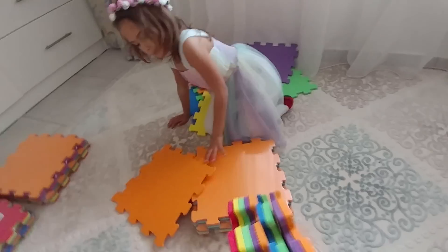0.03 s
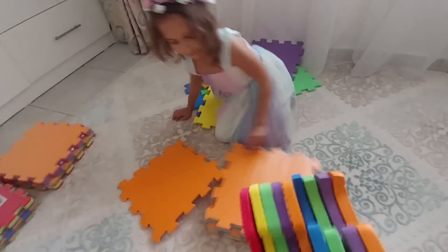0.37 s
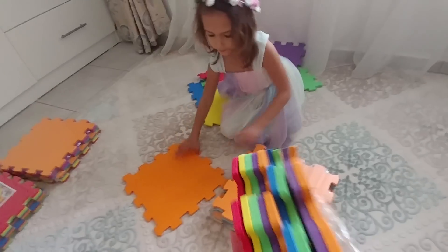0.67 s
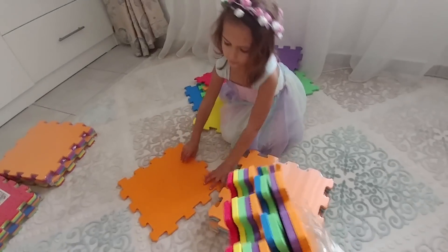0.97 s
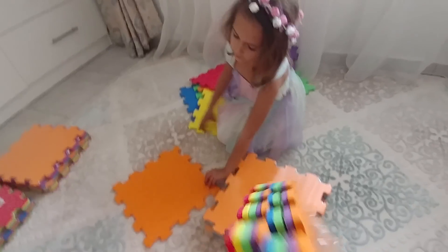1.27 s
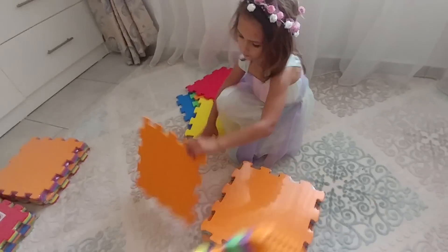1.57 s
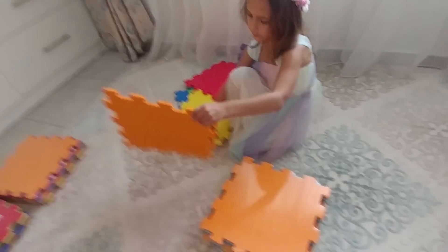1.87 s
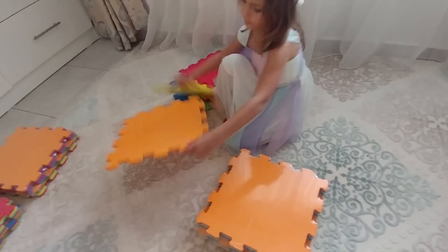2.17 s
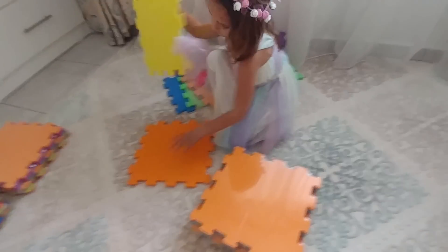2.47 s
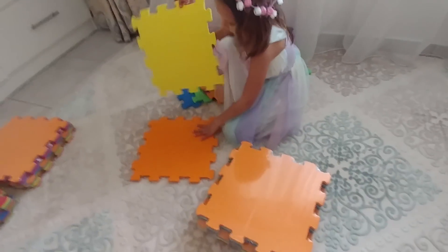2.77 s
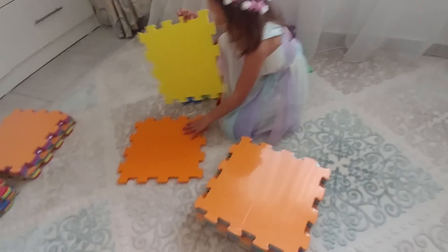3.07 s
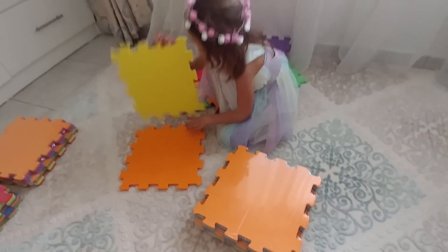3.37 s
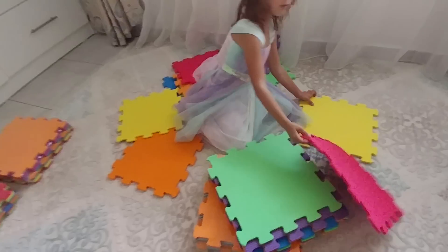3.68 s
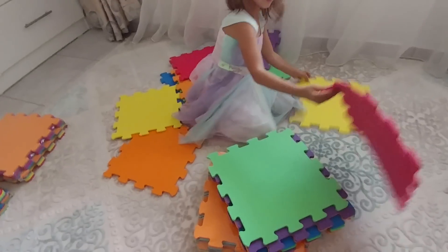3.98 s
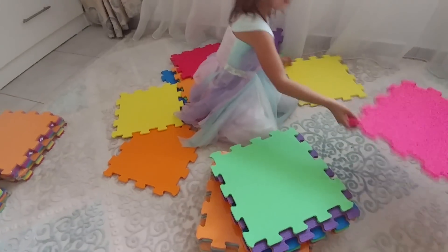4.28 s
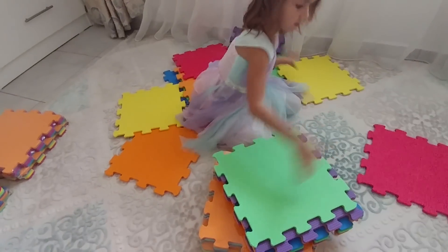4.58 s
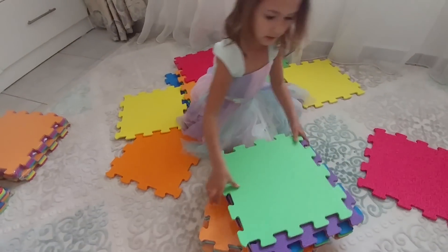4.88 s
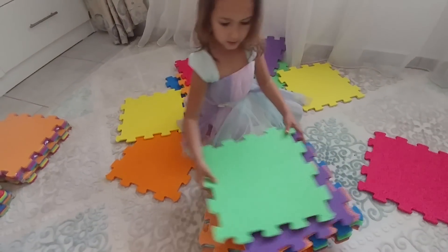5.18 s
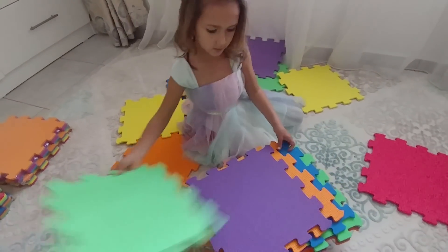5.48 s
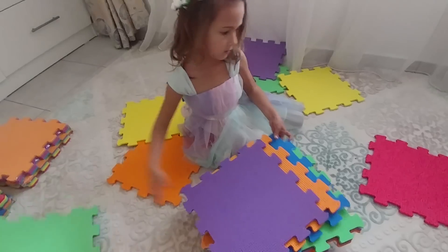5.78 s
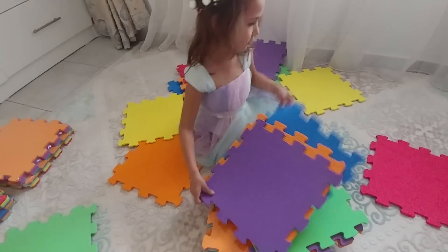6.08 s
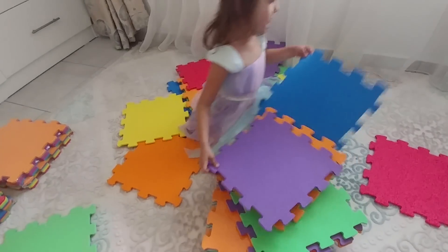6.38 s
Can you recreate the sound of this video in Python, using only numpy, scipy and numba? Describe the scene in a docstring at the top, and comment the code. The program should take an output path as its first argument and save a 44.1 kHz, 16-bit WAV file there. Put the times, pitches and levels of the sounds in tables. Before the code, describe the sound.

Close crackling of plastic wrap and squeezed foam, followed by quieter hissing slides and soft thuds of foam tiles farther away.

```python
"""A small room with a rug. A plastic-wrapped pack of foam floor tiles is gripped and turned right by
the microphone: the film crinkles and snaps, the foam creaks and bumps. Then, farther off, a skirt
rustles, and loose tiles slide off a stack with a fine hiss and flop onto the rug.
Faint room tone and a low drone lie beneath. The microphone ports ring near 9 kHz."""
import sys
import numpy as np
from scipy import signal
from scipy.fft import rfft, irfft, next_fast_len
from scipy.io import wavfile
from numba import njit

SR = 44100
rng = np.random.default_rng(int(sys.argv[2]) if len(sys.argv) > 2 else 0)


def int16_out(signal):
    """Quantize to a 16-bit WAV file."""
    q = np.round(np.clip(np.atleast_2d(signal).T, -1, 1) * 32767)
    wavfile.write(sys.argv[1], SR, q.astype(np.int16))


N = 292912
TIME_S = np.arange(N) / SR

# film tick spectrum (frequency [Hz], density [dB])
TICK_SPECTRUM = [(500, -34), (2000, -16), (4500, -12), (6500, -3.5), (8500, 8.5), (10000, 1.5),
                 (12500, -0.5), (16000, -3.5)]
# foam creak spectrum (frequency [Hz], density [dB])
CREAK_SPECTRUM = [(100, -27.5), (400, -17), (750, -3), (1050, -2), (1400, -3), (1950, 0), (2350, -0.5),
                  (2900, -7.5), (4000, -9), (8000, -29)]


def from_db(db):
    """Decibels to gain."""
    return 10 ** (np.asarray(db) / 20)


def rms_one(x):
    """Scale to rms 1."""
    return x / np.sqrt(np.mean(x ** 2) + 1e-20)


def at_hz(points, hz):
    """Read a table on a log-frequency axis."""
    points_hz, values = np.transpose(points)
    return np.interp(np.log(hz + 1), np.log(points_hz), values)


def panned(db):
    """Constant-power gains; pan is left minus right."""
    gains = from_db(np.array([np.atleast_1d(db), -np.atleast_1d(db)]) / 2)
    return gains / np.sqrt(np.mean(gains ** 2, axis=0))


def response(spectrum, size=4096):
    """Minimum-phase impulse response of a spectrum."""
    cepstrum = irfft(np.log(from_db(at_hz(spectrum, np.fft.rfftfreq(size, 1 / SR)))))
    cepstrum[1:size // 2] *= 2
    cepstrum[size // 2 + 1:] = 0
    return irfft(np.exp(rfft(cepstrum)))


def through(x, impulse):
    """Convolve both channels."""
    return signal.oaconvolve(x, np.atleast_2d(impulse), axes=1)[:, :N]


def coloured(x, spectrum):
    """Shape a white input, keeping its power."""
    impulse = response(spectrum)
    return through(x, impulse / np.linalg.norm(impulse))


def resonance(x, hz, q):
    """Band-pass that keeps the power of a white input."""
    b, a = signal.iirpeak(hz, q, fs=SR)
    return signal.lfilter(b / np.sqrt(b[0]), a, x)


def double_resonance(x, hz, q):
    """Two equal resonances in series."""
    return resonance(resonance(x, hz, q), hz, q)


@njit
def gliding_resonance(x, rad_per_sample, radius):
    """Two-pole resonance with a moving centre."""
    y = np.zeros_like(x)
    for c in range(2):
        for i in range(2, x.shape[1]):
            feedback = 2 * radius * np.cos(rad_per_sample[i]) * y[c, i - 1] - radius ** 2 * y[c, i - 2]
            y[c, i] = x[c, i] - x[c, i - 2] + feedback
    return y


def stereo_noise():
    """White noise, alike on both sides in the low mids, unrelated in the treble."""
    # (frequency [Hz], left-right correlation [ratio])
    correlation = [(50, 0.11), (130, 0.71), (350, 0.9), (700, 0.88), (1400, 0.34), (3000, 0.039), (6500, 0),
                   (16000, 0)]
    size = next_fast_len(N)
    mid, side = rfft(rng.standard_normal((2, size)))
    alike = at_hz(correlation, np.fft.rfftfreq(size, 1 / SR))
    spectra = np.sqrt(1 + alike) * mid + np.sqrt(1 - alike) * side * [[1], [-1]]
    return rms_one(irfft(spectra, size)[:, :N])


def dying(x, fall_s):
    """Exponential decay of each impulse, keeping its sum."""
    pole = np.exp(-1 / (fall_s * SR))
    return signal.lfilter([1 - pole], [1, -pole], x + 1e-18)


def slips(per_s, spread_db, width_db):
    """Energy of random stick-slip releases, uneven in size and direction."""
    at = np.flatnonzero(rng.random(N) < per_s / SR)
    size, side = rng.exponential(1, N)[at], rng.standard_normal(N)[at]
    energy = np.zeros((2, N))
    energy[:, at] = (from_db(spread_db * np.minimum(size, 3)) * panned(width_db * side)) ** 2
    return energy / energy.mean()


def grainy(energy, fall_s, smooth):
    """A noise burst per release, plus a share of smooth friction."""
    return stereo_noise() * np.sqrt(smooth + (1 - smooth) * dying(energy, fall_s))


def stroke(start_s, length_s):
    """Speed of one sweep: from rest to 1 and back."""
    return np.sin(np.pi * np.clip((TIME_S - start_s) / length_s, 0, 1)).clip(0)


def sweeps(rows):
    """Gain of a series of strokes."""
    return np.sqrt(sum((from_db(db) * stroke(s, length_s)) ** 2 for s, length_s, db in rows))


def contacts(rows, spectrum):
    """Soft foam touches bit by bit and is damped at once: swell and fall, no ring."""
    power = np.zeros(N)
    for peak_s, db, rise_s, fall_s in rows:
        decay = np.maximum((peak_s - TIME_S) / rise_s, (TIME_S - peak_s) / fall_s)
        power += from_db(db) ** 2 * np.exp(-2 * np.minimum(decay, 20))
    return coloured(np.sqrt(power) * stereo_noise(), spectrum)


def bumps(rows, rise_cycles, fall_cycles):
    """Knocked foam bends, swings a few times and stops."""
    out, t = np.zeros((2, N + SR)), TIME_S[:SR // 4]
    for start_s, db, hz, pan_db in rows:
        cycles, start = hz * t, round(start_s * SR)
        envelope = (1 - np.exp(-cycles / rise_cycles)) * np.exp(-cycles / fall_cycles)
        swing = envelope * np.sin(2 * np.pi * cycles)
        out[:, start:start + len(t)] += from_db(db) * swing * panned(pan_db)
    return out[:, :N]


def room_tone():
    """Steady, faint, bass-heavy noise."""
    # (frequency [Hz], density [dB])
    spectrum = [(20, -12), (45, -11), (62, 2), (90, -6), (200, -8.5), (500, -14), (1200, -17),
                (3500, -23.5), (8000, -25.5), (11000, -23), (16000, -24)]
    return from_db(-66.5) * coloured(stereo_noise(), spectrum)


def drone():
    """Narrow, wavering rumble in the room."""
    # (time [s], level [dB])
    levels = [(0, -92), (3.598, -74), (3.87, -60.5), (4.05, -71.5), (5.1, -70), (5.6, -79), (6.64, -74)]
    gain = from_db(np.interp(TIME_S, *np.transpose(levels)))
    return gain * rms_one(double_resonance(stereo_noise(), hz=61, q=3.3))


def reflections(x, t60_s=0.19, cutoff_hz=3500):
    """Diffuse room tail, dulled by rug and curtains."""
    t = TIME_S[:SR // 2]
    tail = rng.standard_normal((2, len(t))) * from_db(-60 * t / t60_s) * (t > 0.005)
    tail = signal.sosfilt(signal.butter(1, cutoff_hz, fs=SR, output="sos"), tail)
    return through(x, tail / np.linalg.norm(tail, axis=1, keepdims=True))


def skirt():
    """Thin netting sweeps over the rug."""
    # (time [s], length [s], level [dB])
    strokes = [(3.64, 0.38, -55), (3.97, 0.12, -52), (4.06, 0.29, -58), (4.40, .08, -68.5)]
    # (frequency [Hz], density [dB])
    spectrum = [(200, -17), (900, -10.5), (2500, -17.5), (5000, -19.5), (7500, -10), (9500, 0.5),
                (10800, 8.5), (12500, -2.5), (15500, -16)]
    return coloured(sweeps(strokes) * stereo_noise(), spectrum) * from_db(3) * panned(-2.5)


def tile_slides(rub_exponent=0.47):
    """Embossed faces rub: hiss follows speed, rub a power of it. One tile catches and squeaks."""
    # (time [s], length [s], rub [dB], hiss [dB])
    slides = [(4.605, .11, -65, -58), (4.703, 0.12, -56.5, -53), (4.985, .13, -59.5, -62.5),
              (5.09, 0.16, -54.5, -48), (5.197, 0.15, -67, -51.5), (5.409, 0.12, -71, -70),
              (5.63, 0.15, -72.5, -68), (5.8, 0.1, -52, -46), (5.862, 0.54, -57, -41),
              (6.286, 0.24, -62.5, -48.5), (6.487, .17, -53.5, -51)]
    # (time [s], length [s], level [dB])
    catches = [(5.98, 0.031, -52.5)]
    # (frequency [Hz], density [dB])
    rub_spectrum = [(100, -21), (600, -13.5), (1400, -4), (2400, -3.5), (3300, -4.5), (4300, -8),
                    (5500, -5.5), (12000, -49)]
    hiss_spectrum = [(500, -55), (2000, -9.5), (4500, -3), (7000, 0), (9500, 5.5), (10800, 9), (13000, 5),
                     (16000, -1)]
    rub_gain, hiss_gain = np.zeros((2, N))
    for start_s, length_s, rub_db, hiss_db in slides:
        speed = stroke(start_s, length_s)
        rub_gain = np.hypot(rub_gain, from_db(rub_db) * speed ** rub_exponent)
        hiss_gain = np.hypot(hiss_gain, from_db(hiss_db) * speed)
    energy = slips(per_s=2000, spread_db=9.5, width_db=9)
    rub = coloured(rub_gain * grainy(energy, fall_s=0.00085, smooth=0.78), rub_spectrum)
    hiss = coloured(hiss_gain * grainy(energy, fall_s=0.00048, smooth=0.9), hiss_spectrum)
    catch = sweeps(catches) * rms_one(double_resonance(stereo_noise(), hz=3340, q=9))
    return rub * from_db(-1.5) * panned(-1.9) + hiss * from_db(2.5) * panned(-1.5) + catch


def scuff_and_landings():
    """A brief scuff leads into the pack's last tick; later, tiles flop down and pat flat."""
    # (time [s], level [dB], rise [s], fall [s])
    flops = [(4.275, -58, .02, 0.033), (5.327, -47.5, .005, 0.024), (5.718, -48, 0.004, 0.034),
             (5.763, -41, 0.0026, 0.023), (5.787, -36, 0.002, 0.012), (5.809, -39, 0.0061, 0.026),
             (6.425, -54, 0.021, 0.049), (6.503, -45, 0.0045, 0.028)]
    scuff_and_pats = [(3.668, -46.5, 0.011, 0.003), (4.614, -38.5, 0.0008, 0.029),
                      (5.359, -54, .001, 0.0046)]
    # (frequency [Hz], density [dB])
    flop_spectrum = [(25, -4), (65, -1.5), (130, 2), (300, -1), (600, -6.5), (950, -12.5), (1500, -26.5),
                     (4000, -44), (12000, -49)]
    scuff_and_pat_spectrum = [(40, -2), (140, 11.5), (300, 3), (800, 0.5), (1400, 8.5), (2300, 5.5),
                              (3500, 0), (6000, -29), (14000, -1)]
    return contacts(flops, flop_spectrum) + contacts(scuff_and_pats, scuff_and_pat_spectrum)


def tile_edges():
    """Toothed edges scuff the rug and swish past other tiles."""
    # (time [s], level [dB], rise [s], fall [s])
    scuffs = [(4.29, -60, 0.022, 0.036), (5.292, -55.5, .003, 0.012), (5.329, -49.5, 0.0091, 0.014),
              (5.356, -53, .004, 0.0061)]
    swishes = [(4.77, -51, 0.035, 0.024), (5.285, -36.5, 0.05, 0.023), (5.729, -38, 0.0026, 0.0086)]
    # (frequency [Hz], density [dB])
    scuff_spectrum = [(60, -19), (200, -8), (450, -2), (800, -4), (1150, -10), (1600, -15), (3000, -31),
                      (10000, -24)]
    swish_spectrum = [(3000, -23), (7000, -32), (10000, -21), (12000, -11), (14000, -5), (16000, -9)]
    return contacts(scuffs, scuff_spectrum) + contacts(swishes, swish_spectrum)


def tile_thuds():
    """Falling tiles knock edge-on or thud flat on the floor."""
    # (time [s], level [dB], pitch [Hz], pan [dB])
    thuds = [(5.288, -40.5, 1050, -2), (5.335, -51.5, 89.4, -2), (5.716, -40.5, 66, 1),
             (5.788, -34, 147, 1), (6.505, -41.5, 125, -3)]
    return bumps(thuds, rise_cycles=0.35, fall_cycles=2.74)


def pack_knocks():
    """The pack knocks hollowly against hand and microphone."""
    # (time [s], level [dB], pitch [Hz], pan [dB])
    knocks = [(.113, -10, 410, 3), (0.353, -43.5, 146, -1), (.793, -41.5, 330, -4), (0.846, -30, 630, -5),
              (0.876, -27.5, 483, 3), (0.936, -38, 298, -6), (1.25, -36, 340, -1), (1.40, -39, 100, -11),
              (1.72, -32, 120, -1), (2.327, -33.5, 250, 1), (2.476, -21.5, 64, -12),
              (3.505, -38.5, 95.6, -8.5)]
    return bumps(knocks, rise_cycles=0.11, fall_cycles=2)


def snap(gains, tail_share, fall_s, size):
    """A click with a short noisy tail."""
    click = np.zeros((2, size))
    click[:, :1] = gains
    tail = np.sqrt(tail_share * dying(click ** 2, fall_s)) * rng.standard_normal((2, size))
    return np.sqrt(1 - tail_share) * click + tail


def film_snaps(size=1024):
    """The film buckles with a tick and knocks on the foam, which rings briefly."""
    # (time [s], knock [dB], tick [dB], pan [dB], foam ring [Hz])
    buckles = [(0.0513, -9.5, -15, -3, 725), (.077, -2.5, 2.5, -7.5, 1630), (0.1133, 10.5, -0.5, -1.5, 850),
               (0.1318, 2.5, -16.5, -6, 1280), (0.1868, -24, -7, -19, 1600), (0.2636, -14, -10, 3, 1360),
               (0.4074, -25, -17, -2, 1240), (0.6862, -15, -0.5, -7, 2010), (.6906, -14, -2, -5, 2100),
               (0.7284, -25, -1, -3, 1850), (0.744, -27, -1.5, -11, 1840), (1.002, -21, 2, 2, 1520),
               (1.0274, -6.5, 0, -13, 1710), (1.2581, -16.5, -3, -12, 624), (1.3815, -30, -8, -23, 1850),
               (1.4143, -12.5, 4.5, 1, 1730), (1.4685, -9.5, -32, 3, 1770), (1.5509, -10, -10, 0, 1650),
               (1.6416, -24, 0, -27, 1160), (1.655, -26, 5.5, -13, 2140), (1.7171, -6.5, -19, -14, 1200),
               (1.761, -6, 7, -24, 1820), (1.7784, -2, -7, 2, 1910), (1.8724, -9.5, -28, 0, 1020),
               (1.9607, -2.5, -11, -4, 1800), (1.9718, -7.5, 7, -30, 2040), (2.0309, -2, 8, -10, 2150),
               (2.0465, -0.5, -3, -9.5, 1840), (2.0832, -7, -8, -12, 1830), (2.1355, -26, 3, -17, 1790),
               (2.1546, -1.5, 10, -4.5, 1850), (2.229, -19, -5, -5, 2270), (2.2887, -14, -11, -6, 1270),
               (2.3538, -13, -21, -3, 990), (2.3997, 0.5, 5, -0.5, 2090), (2.42, 10.5, 1.5, -3, 2100),
               (2.4621, 11, 9.5, 2, 1480), (2.4838, -1.5, -3.5, -4.5, 1700), (2.5479, -9, -6, -14, 1600),
               (2.7427, -8, -7, 3, 2270), (2.8512, -20, -9, 6, 1650), (2.9427, -13.5, -5, -5, 1630),
               (3.1099, -24, -7.5, -3, 1570), (3.1929, -22.5, -5.5, -7, 1500),
               (3.2089, -18.5, -14, -1, 2060), (3.2793, -39, -2, 16, 2090), (3.3586, -22, -3, -5, 2270),
               (3.5235, -17.5, -7, -1, 1020), (3.543, -27, -8, -17, 1980), (3.6186, -36, -9.5, -7, 2200),
               (3.6684, -32.5, -0.5, -1.5, 1010)]
    # (frequency [Hz], density [dB])
    knock_spectrum = [(30, -16), (100, -9.5), (350, -10.5), (700, 7), (1100, 0.5), (1800, 4.5), (2400, 3.5),
                      (3200, -13.5), (6000, -8.5), (12000, -37)]
    knocks, rings, ticks = np.zeros((3, 2, N))
    for start_s, knock_db, tick_db, pan_db, hz in buckles:
        at = slice(round(start_s * SR), round(start_s * SR) + size)
        pan = panned(pan_db)
        knock = snap(from_db(knock_db) * pan, tail_share=0.3, fall_s=0.0015, size=size)
        knocks[:, at] += knock
        rings[:, at] += double_resonance(knock, hz, q=1.3) * np.sqrt(10 * hz / SR)
        ticks[:, at] += snap(from_db(tick_db) * pan, tail_share=0.91, fall_s=0.0005, size=size)
    foam = from_db(-8) * coloured(knocks, knock_spectrum) + from_db(-6) * rings
    return foam + from_db(-8.5) * coloured(ticks, TICK_SPECTRUM)


def film_creases(count=9):
    """Small creases flip one by one, each ringing at its own pitch."""
    energy = slips(per_s=300, spread_db=3.5, width_db=10.5)
    crease_index = rng.integers(0, count, N)
    noise = rng.standard_normal((2, N))
    rings = np.zeros((2, N))
    for k, hz in enumerate(np.geomspace(4200, 13000, count)):
        envelope = np.sqrt(dying(energy * (crease_index == k), fall_s=0.00035))
        rings += resonance(envelope * noise, hz, q=5.2)
    return coloured(rings, TICK_SPECTRUM)


def foam_squeak(hz, width_hz=280):
    """Separate slips ring the squeezed foam at the pitch of the grip."""
    energy = slips(per_s=150, spread_db=4, width_db=0.5)
    kicks = coloured(grainy(energy, fall_s=0.0013, smooth=0.15), CREAK_SPECTRUM)
    return rms_one(gliding_resonance(kicks, 2 * np.pi * hz / SR, np.exp(-np.pi * width_hz / SR)))


def held(start_s, rise_s, hold_s, fall_s=0.021):
    """Attack, hold and release of one squeeze."""
    t = TIME_S - start_s
    return np.exp(-np.clip(np.maximum(-t / rise_s, (t - hold_s) / fall_s), 0, 20))


def grip(stir_hz=1400, wander_db=2.5, wanders_per_s=52):
    """Squeezes over a faint stir: bump, creak and crinkle gains, and creak-weighted foam pitch."""
    # (time [s], rise [s], hold [s], bump [dB], creak [dB], crinkle [dB], foam ring [Hz])
    squeezes = [(0.034, 0.031, 0.034, -51, -50, -38, 900.0),
                (0.084, 0.019, 0.046, -39.5, -29.5, -26.5, 1600.0),
                (0.122, 0.012, 0.022, -29, -26.5, -19, 1750.0),
                (0.217, 0.018, 0.069, -56, -44.5, -44.5, 1500.0),
                (0.479, 0.008, 0.054, -54.5, -55.5, -49.5, 1200.0),
                (0.659, 0.02, 0.056, -50, -39.5, -32.5, 1900.0),
                (0.794, 0.013, 0.026, -54.5, -53, -41.0, 1000.0),
                (0.853, 0.006, 0.016, -39.5, -32, -28.5, 800.0),
                (0.943, 0.019, 0.003, -40.5, -39.5, -33.0, 1300.0),
                (1.005, 0.024, 0.036, -48.5, -37.5, -29.5, 1900.0),
                (1.141, 0.024, 0.038, -61, -57, -39.5, 2000.0),
                (1.232, 0.028, 0.038, -45.5, -47, -42.5, 1300.0),
                (1.279, 0.014, 0.028, -58, -47.0, -36.5, 1300.0),
                (1.406, 0.019, 0.012, -38.5, -35, -30, 1650.0),
                (1.491, 0.017, 0.082, -45, -40.5, -37.5, 1100.0),
                (1.64, 0.016, 0.022, -52, -45.5, -32, 1400.0),
                (1.683, 0.013, 0.05, -42.5, -39, -39, 1400.0),
                (1.756, 0.027, 0.057, -36.5, -27.0, -19, 1900.0),
                (1.882, 0.014, 0.052, -63, -51, -41, 1200.0),
                (1.958, 0.005, 0.034, -48, -37.0, -25, 2050.0),
                (2.043, 0.012, 0.004, -40, -27.5, -18.5, 1900.0),
                (2.089, 0.013, 0.03, -60, -40, -36.5, 1750.0),
                (2.149, 0.016, 0.003, -35, -27, -20.0, 1950.0),
                (2.212, 0.006, 0.005, -59, -44.5, -35.5, 1900.0),
                (2.291, 0.026, 0.074, -52.5, -49, -50.5, 1200.0),
                (2.401, 0.015, 0.06, -48, -30.5, -27.5, 2000.0),
                (2.48, 0.022, 0.004, -20, -16, -10, 1700.0),
                (2.521, 0.014, 0.074, -43.5, -33.5, -30.5, 1700.0),
                (2.681, 0.046, 0.009, -68, -42, -32.5, 1900.0),
                (2.727, 0.023, 0.103, -50, -37.5, -32.0, 1900.0),
                (2.848, 0.006, 0.087, -49.5, -35.5, -32.5, 1400.0),
                (3.12, 0.023, 0.004, -63, -46.5, -37, 1600.0), (3.19, 0.01, 0.079, -81, -52, -44, 2000.0),
                (3.277, 0.007, 0.02, -57.5, -46.5, -32.0, 1650.0),
                (3.341, 0.023, 0.075, -59.5, -54.5, -44, 1700.0),
                (3.497, 0.024, 0.044, -52.5, -51.5, -42, 1700.0)]
    # (bump [dB], creak [dB], crinkle [dB])
    stir_db = [-66.5, -60.5, -53]
    wander = np.interp(TIME_S * wanders_per_s, np.arange(1024), rng.standard_normal(1024))
    stir = held(0, rise_s=0.021, hold_s=3.55) * from_db(wander_db * wander)
    power = np.outer(from_db(stir_db), stir) ** 2
    weighted_pitch = stir_hz * power[1]
    for start_s, rise_s, hold_s, *levels_db, hz in squeezes:
        squeeze = np.outer(from_db(levels_db), held(start_s, rise_s, hold_s)) ** 2
        power += squeeze
        weighted_pitch += hz * squeeze[1]
    return *np.sqrt(power), weighted_pitch / power[1]


def pack_handling():
    """Slips shake film, foam and whole pack; lower parts ring longer. Large folds crackle singly."""
    # swing to the right and back (time [s], pan [dB])
    swing = [(1.4, -1), (1.75, -3.5), (2.2, -3.5), (2.42, -1)]
    # (frequency [Hz], density [dB])
    film_spectrum = [(300, -31), (1500, -12.5), (3200, -3.5), (4300, -5), (5400, -0.5), (6800, 0),
                     (10000, 3.5), (13000, 2), (16000, -7)]
    body_spectrum = [(25, -21.5), (45, -1.5), (65, 1), (90, -8), (160, -6.5), (340, -5), (550, -4.5),
                     (800, -5), (1500, -34.5), (4000, -61.5)]
    bump, creak, crinkle, foam_hz = grip()
    energy = slips(per_s=550, spread_db=-1, width_db=5.5)
    film = coloured(crinkle * grainy(energy, fall_s=0.00042, smooth=0.61), film_spectrum) * from_db(-7.5)
    film += crinkle * film_creases() * from_db(-18) * panned(-1.1)
    folds = grainy(slips(per_s=76, spread_db=4, width_db=7.5), fall_s=0.0005, smooth=0)
    film += coloured(crinkle * folds, film_spectrum) * from_db(-10)
    foam = coloured(creak * grainy(energy, fall_s=0.00086, smooth=0.2), CREAK_SPECTRUM) * from_db(-3.5)
    foam += creak * foam_squeak(foam_hz) * from_db(-4.5)
    body = coloured(bump * grainy(energy, fall_s=0.0028, smooth=0.23), body_spectrum) * from_db(-1)
    swing_db = np.interp(TIME_S, *np.transpose(swing))
    return (film + foam) * panned(swing_db) + body * panned(-1.5)


def scene(left_lag_samples=5):
    """Pack close and nearly dry; loose tiles and skirt farther off, slightly right."""
    near = pack_handling() + film_snaps() + pack_knocks()
    far = tile_slides() + skirt() + scuff_and_landings() + tile_edges() + tile_thuds()
    far[0] = np.pad(far[0], (left_lag_samples, 0))[:N]
    far *= panned(-0.64)
    background = room_tone() + drone()
    return near + far + reflections(from_db(-19) * near + from_db(-17) * far) + background


def record(dry, cutoff_hz=15900):
    """Microphone: the ports ring, the highest peaks clip, the top is cut."""
    # (frequency [Hz], gain [dB])
    port_gain = [(20, -1), (6500, 1), (7600, 1.5), (8400, 6.5), (9200, 10), (9850, 2), (10700, -14.5),
                 (11700, -6.5), (16000, -3.5)]
    clipped = np.clip(through(dry, response(port_gain)), -1, 1)
    return signal.sosfilt(signal.ellip(10, 0.1, 70, cutoff_hz, fs=SR, output="sos"), clipped)


dry = scene()
out = record(dry)
int16_out(out)
```